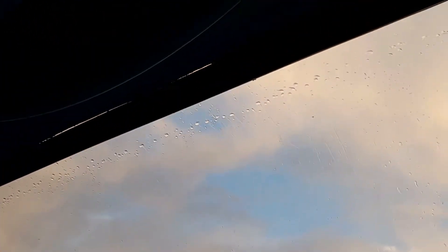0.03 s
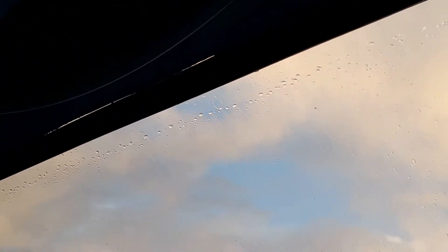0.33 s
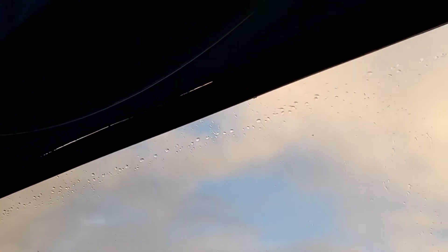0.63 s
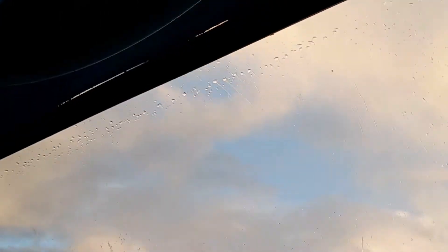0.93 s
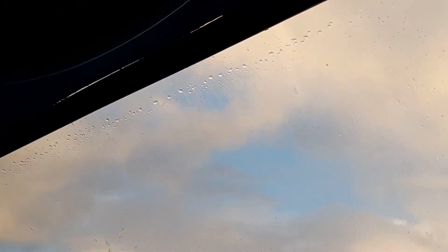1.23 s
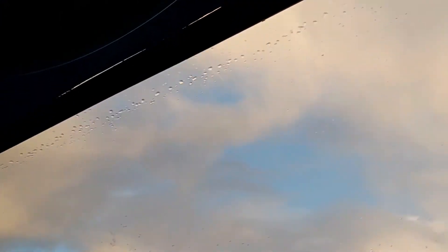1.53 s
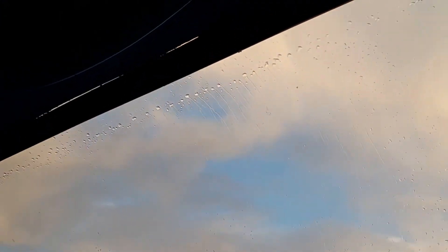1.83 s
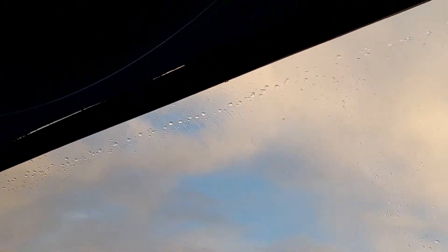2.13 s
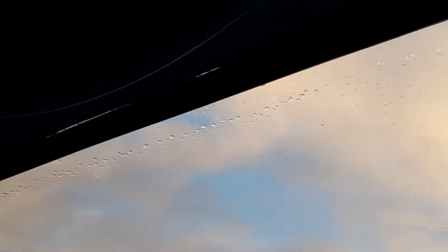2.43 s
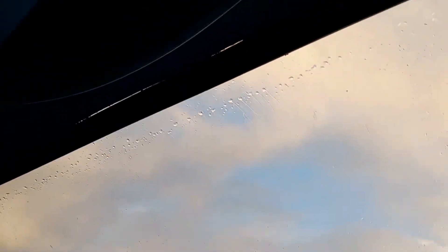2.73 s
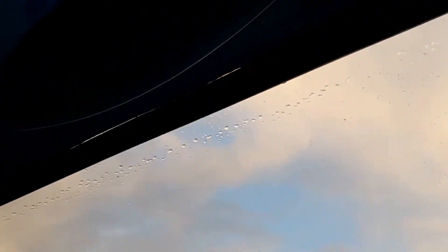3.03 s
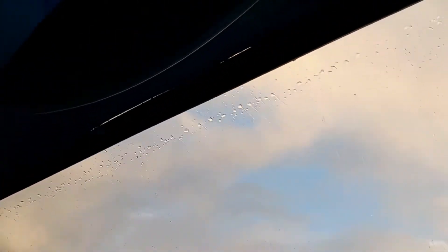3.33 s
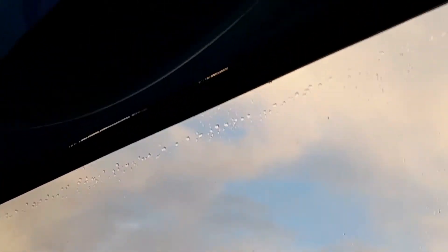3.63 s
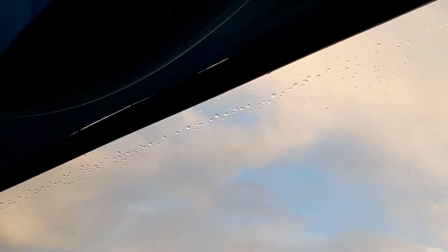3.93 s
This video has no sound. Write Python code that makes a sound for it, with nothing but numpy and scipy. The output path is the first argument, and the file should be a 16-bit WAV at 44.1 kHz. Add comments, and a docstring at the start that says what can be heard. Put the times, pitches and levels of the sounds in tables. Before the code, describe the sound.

A thin, high whistle of air sputters through a window gap, heard close by inside a moving bus. Low engine drone and road rumble continue underneath, while a loose panel knocks unevenly, pauses briefly, then rattles harder.

```python
"""Inside a moving bus, next to a window that does not quite seal.
The drive line booms through the cabin over road rumble; air hisses through the gap and breaks into a thin,
sputtering whistle. A loose panel knocks at uneven moments, now with a dry snap, now with a brighter ring."""
import sys
import numpy as np
from scipy import signal
from scipy.io import wavfile

SR = 44100
rng = np.random.default_rng(int(sys.argv[2]) if len(sys.argv) > 2 else 0)


def unload_audio(sound):
    """Save the sound as a 16-bit wav file, at the path given as the first command line argument."""
    columns = np.transpose(np.atleast_2d(sound))
    # keep every value between -1 and 1, then stretch to whole-number steps
    steps = np.round(np.clip(columns, -1, 1) * 32767)
    wavfile.write(sys.argv[1], SR, steps.astype(np.int16))


N = 176400

# cabin boom: (s, pitch Hz, level dB)
BOOM = [(0, 66.47, -19), (.5, 68.2, -15), (1.0, 68, -16.5), (1.5, 68.8, -14.5), (1.9, 67.73, -16.5), (2.2, 67.85, -21.5), (2.8, 67.4, -20.5), (3.3, 67, -21), (3.7, 67.44, -20.5), (4.0, 66.05, -17)]
BOOM_ORDER = 5  # fixed
# other multiples of the shaft rate: (order, dB in the first seconds, dB in the last)
ORDERS = [(4, -42, -64), (6, -27, -28), (8, -49, -32.5), (10, -30.5, -35.5), (10.92, -44, -30.5), (12, -45, -41.5)]
BOOM_WAVER_DB, ORDER_WAVER_DB, PHASE_WAVER_RAD = 1.5, 2, 0.54
# road rumble and cabin air: (Hz, dB per Hz), (s, level dB)
ROAD = [(20, -11.5), (30, -8), (48, 2), (72, -1.5), (100, 2), (125, -2.5), (160, -9), (200, -9), (260, -17), (330, -13), (420, -22), (560, -21), (720, -22), (1000, -27.5), (1400, -31.5), (2000, -36), (3000, -49)]
ROAD_LEVEL = [(0, -25), (1.4, -26.5), (2.0, -26.5), (2.3, -26), (2.7, -26.5), (3.6, -26), (4.0, -24)]
# panel resonances that the road keeps stirred: (Hz, width Hz, dB)
PANEL_HUM = [(705, 24, -51.5), (861, 20, -55.5), (1270, 46, -62.5)]
# air rushing through the gap: (Hz, dB per Hz), (s, level dB)
HISS = [(1000, 0.5), (2000, 3), (3000, -1.5), (3900, 2.5), (4900, -4.5), (5600, 11), (6400, 0), (7400, -4), (8300, -10.5), (9200, -11.5), (11000, -8.5), (15500, -15)]
HISS_LEVEL = [(0, -40.5), (.65, -42), (1.0, -45.5), (1.8, -43.5), (2.3, -44), (2.7, -47.5), (3.0, -43.5), (3.35, -45), (4.0, -44)]
HISS_FLICKER_DB = 0.7  # fixed
# the whistle: (s, pitch Hz, level dB)
WHISTLE = [(0, 5870, -41), (.17, 5665, -40), (.38, 5650, -40), (.7, 5710, -43), (.85, 5620, -48), (1.0, 5586, -57), (1.27, 5620, -50), (1.36, 5567, -45.5), (1.8, 5670, -44), (2.02, 5562, -46.5), (2.13, 5455, -46.5), (2.26, 5370, -41), (2.37, 5422, -52.5), (2.7, 5230, -52), (2.82, 5170, -70), (2.93, 5400, -48), (3.2, 5442, -55), (3.45, 5430, -57), (3.57, 5436, -41), (3.73, 5320, -57), (4.0, 5375, -54)]
WHISTLE_WIDTH_HZ, WHISTLE_WANDER_HZ, WHISTLE_FLUTTER_DB = 230, 70.4, 1.5
# breathy side tone under the whistle: (s, pitch Hz, level dB)
UNDERTONE = [(0, 5300, -45), (.2, 5300, -42.5), (.65, 5290, -48), (.9, 5000, -48), (1.02, 4940, -56), (1.22, 4850, -49), (1.35, 5035, -49), (1.8, 5080, -49.5), (2.25, 5216, -44.5), (2.7, 4990, -59), (2.95, 5200, -47), (3.3, 5120, -60), (4.0, 5077, -50)]
UNDERTONE_WIDTH_HZ, UNDERTONE_FLUTTER_DB = 540, 1.5
# the jet locks for a moment into a pure chirp: (s, pitch Hz, level dB)
CHIRPS = [(.103, 5900, -46), (.136, 5720, -34.5), (.176, 5727, -33), (0.221, 5600, -43), (.312, 5710, -35), (.336, 5600, -37), (0.382, 5555, -32), (0.52, 5520, -30.5), (.68, 5760, -37), (.927, 5500, -35.5), (1.917, 5870, -43), (2.122, 5320, -47), (2.206, 5370, -41), (2.225, 5250, -34.5), (2.245, 5180, -60), (2.262, 5447, -34), (2.283, 5440, -44), (2.307, 5070, -47), (2.336, 5480, -49), (2.396, 5490, -40), (2.59, 5170, -37.5), (2.636, 5050, -39), (2.916, 5400, -37.5), (3.02, 5450, -37), (3.084, 5433, -44), (3.169, 5420, -38.5), (3.523, 5380, -34.5), (3.602, 5450, -35.5), (3.924, 5470, -41)]
# upper resonance of the gap: (s, pitch Hz, level dB)
OVERTONE = [(0, 7400, -49), (.4, 7120, -53.5), (.68, 7300, -53), (.85, 8000, -55), (1.05, 7700, -54), (1.3, 7980, -56), (1.5, 7360, -55), (1.75, 7160, -50.5), (2.1, 7400, -58.5), (2.45, 7850, -53.5), (2.6, 7486, -52), (2.75, 7310, -55.5), (3.0, 7800, -53), (3.35, 7630, -53), (3.55, 7600, -53.5), (4.0, 7410, -55)]
OVERTONE_WIDTH_HZ, OVERTONE_FLUTTER_DB, OVERTONE_WANDER_HZ = 860, 3, 109.2
WHISTLE_PAN_DB, WHISTLE_LIKENESS, BOOM_PAN_DB, ORDER_PAN_DB = -4.5, -0.43, -4.5, -2.5
# knocks of the loose panel: (s, peak dB, extra ring of its bright rim mode dB, extra snap dB)
KNOCKS = [(0.0872, -27.5, -2, 2), (0.2312, -25.5, 1, 0), (0.3398, -19, -5, 2), (.364, -28, 0, 3), (0.6081, -20, -4.5, -3), (0.98, -23.5, -8, 0), (1.089, -22, -1, -0.5), (1.1626, -27.5, -7, -7), (1.2578, -28.5, -13, -8), (1.333, -25, 7, 1.5), (1.3928, -27, -13, -5), (1.4339, -27.5, -5, -9), (1.4947, -24, 3, -3.5), (1.5927, -19, 5, -4.5), (1.7404, -29, -3, -1), (1.8964, -21.5, 0, -5), (2.0191, -17, 8, 0), (2.0565, -24.5, 7, -3), (2.8024, -21.5, -9, 1), (2.865, -15, 0.5, 1.5), (2.9344, -19, -3, 2.5), (3.054, -14.5, 2, 1), (3.146, -28.5, -2, 1), (3.2603, -19, -8, 1), (3.493, -29, -1, 4.5), (3.5662, -23.5, -2, -6), (3.7276, -13.5, -3.5, -5), (3.8728, -22, 3, 3), (3.927, -19, -14, -25), (3.9818, -18, 5, -2.5)]
# what it rings with: (Hz, dB, t60 s, left-right dB)
PANEL = [(450, -18.5, 0.09, -2), (660, -18, 0.032, -2), (894, -9, 0.018, -3.5), (1080, -7, 0.021, -4), (1300, -7, 0.018, 3.5), (1700, -13.5, 0.013, -4), (2070, -14.5, 0.0077, -12), (2340, -10, 0.0085, -3), (2530, -8.5, 0.0087, -9), (2800, -8, 0.0066, -3), (3253, -10, 0.012, -13), (4060, -16.5, 0.0059, -7), (4200, -23, 0.0053, 1), (5300, -29, 0.0046, 5)]
RIM_MODE_INDEX = 10  # fixed
KNOCK_DB, CONTACT_HZ, CONTACT_OCTAVES_PER_DB = -2, 6500, 0.0052
KNOCK_VARY_DB, KNOCK_DETUNE = 1.2, .012  # fixed
# the gritty snap of the contact: (Hz, dB per Hz)
SNAP = [(380, 8), (600, 5), (850, 8), (1300, 2.5), (1800, 3.5), (2700, 6), (3400, 1.5), (4100, -2.5), (5600, -2.5), (6800, -14.5), (8500, -27)]
GLASS_ECHO_S, GLASS_ECHO_DB = .0024, -4.5
# reflections, from near surfaces and from the whole cabin: (t60 s, energy dB)
REFLECTIONS = [(0.025, -6), (.18, .5)]  # fixed
# the cabin's noise across the ears: (Hz, left-right likeness), (Hz, left-right dB)
LIKENESS = [(60, 0.1), (100, 0.9), (160, 0.8), (270, 0.94), (450, 0.66), (740, 0.52), (1220, -0.03), (5500, 0.06), (15000, 0)]
BALANCE = [(60, -8.5), (100, -1), (160, -2.5), (450, -1), (740, 0.5), (1220, -2), (2500, -4.5), (5000, -2.5), (8000, 0), (15000, -3.5)]
CUTOFF_HZ = 15800  # fixed
SNAP_DB = 4
SNAP_RISE_S, SNAP_DECAY_S = .0008, .0015  # fixed
CHIRP_HALF_S = 0.011
CHIRP_WANDER_HZ = 65  # fixed


def from_db(db):
    """Decibels to gain."""
    return 10 ** (np.asarray(db) / 20)


def rms_one(x):
    """Scale to rms 1."""
    return x / np.sqrt(np.mean(np.abs(x) ** 2) + 1e-20)


def in_time(rows):
    """Join the rows of a curve by straight lines."""
    s, *columns = np.transpose(rows)
    return [np.interp(np.arange(N) / SR, s, c) for c in columns]


def at_hz(points, hz):
    """Read a spectrum on a log-frequency axis."""
    return np.interp(np.log(hz), np.log(np.array(points)[:, 0]), np.array(points)[:, 1])


def pan(db):
    """Left and right gains for a level difference."""
    gains = from_db([[db / 2], [-db / 2]])
    return gains / gains.mean()


def spread(mid, side, alike):
    """Two unrelated signals become a stereo pair of given likeness."""
    alike = np.clip(alike, -.999, .999)  # fixed
    return np.sqrt((1 + alike) / 2) * mid + np.sqrt((1 - alike) / 2) * side * np.array([[1], [-1]])


def drift(rate):
    """Slow chance with spread 1."""
    r = np.exp(-16 * np.pi * rate / SR)  # fixed
    slow = signal.lfilter([1], [1, -2 * r, r * r], rng.standard_normal(N // 8 + 8002))[8000:]  # fixed
    return np.interp(np.arange(N) / 8, np.arange(len(slow)), rms_one(slow))  # fixed


def phase_of(hz):
    """Running phase of a pitch."""
    return 2 * np.pi * np.cumsum(hz * np.ones(N)) / SR


def resonance(hz, width_hz, alike):
    """Stereo noise in one resonance, whose centre may move."""
    phase = phase_of(hz)
    mid, side = [drift(width_hz / 2) * np.cos(phase) + drift(width_hz / 2) * np.sin(phase) for _ in range(2)]
    return spread(mid, side, alike)


def banded_noise(spectrum, patchy_db, flicker_rate):
    """Third-octave bands of stereo noise, each with its own flicker, likeness and balance; rms 1."""
    out, edges = 0, 18 * 2 ** (np.arange(31) / 3)  # fixed
    white = rng.standard_normal((2, 2, N + SR // 2))
    for k, (low, high) in enumerate(zip(edges, edges[1:])):
        hz, flicker = np.sqrt(low * high), drift(flicker_rate)
        if high > spectrum[0][0] and low < spectrum[-1][0]:
            mid, side = signal.sosfilt(signal.butter(3, [low, high], "band", fs=SR, output="sos"), white[k % 2])[:, -N:]  # fixed
            out = out + from_db(at_hz(spectrum, hz) + patchy_db * flicker) * pan(at_hz(BALANCE, hz)) * spread(mid, side, at_hz(LIKENESS, hz))
    return rms_one(out)


def ring(clicks, hz, t60):
    """A unit click sets a mode of height 1 ringing."""
    r, w = from_db(-60 / (t60 * SR)), 2 * np.pi * hz / SR  # fixed
    return signal.lfilter([.5, 0, -.5], [1, -2 * r * np.cos(w), r * r], clicks + 1e-18)


def cabin(x):
    """The direct sound, a hard echo off the glass, then scattered reflections."""
    t = np.arange(SR // 4) / SR  # fixed
    response = np.zeros((2, len(t)))
    response[:, 0] = 1
    response[:, int(GLASS_ECHO_S * SR)] += from_db(GLASS_ECHO_DB)
    for t60, db in REFLECTIONS:
        tail = rng.standard_normal(response.shape) * from_db(-60 * t / t60) * (t > GLASS_ECHO_S)  # fixed
        response += from_db(db) * rms_one(tail) / np.sqrt(len(t))
    return signal.fftconvolve(x, response, axes=1)[:, :N]


def drive_line():
    """One order of the shaft booms in the cabin; weaker ones waver and beat against it."""
    hz, db = in_time(BOOM)
    phase = phase_of(hz)
    out = pan(BOOM_PAN_DB) * from_db(db + BOOM_WAVER_DB * drift(2.24)) * np.sin(phase)
    for order, first_db, last_db in ORDERS:
        gain = from_db(np.linspace(first_db, last_db, N) + ORDER_WAVER_DB * drift(1.9))
        out = out + pan(ORDER_PAN_DB) * gain * np.sin(order / BOOM_ORDER * phase + PHASE_WAVER_RAD * drift(2.2) + rng.uniform(0, 2 * np.pi))
    return np.sqrt(2) * out


def road():
    """Tyre rumble through the body, with a few humming panels."""
    db, = in_time(ROAD_LEVEL)
    hum = sum(from_db(level_db) * resonance(hz, width, at_hz(LIKENESS, hz)) for hz, width, level_db in PANEL_HUM)
    return from_db(db) * banded_noise(ROAD, patchy_db=1.56, flicker_rate=14.6) + hum


def gap_hiss():
    """Smooth rush of air past the seal."""
    db, = in_time(HISS_LEVEL)
    return from_db(db) * banded_noise(HISS, patchy_db=HISS_FLICKER_DB, flicker_rate=22)


def whistle():
    """The turbulent jet stirs three resonances of the gap and sputters into short pure tones."""
    tone = gap_tone(WHISTLE, WHISTLE_WIDTH_HZ, WHISTLE_WANDER_HZ, WHISTLE_FLUTTER_DB, WHISTLE_LIKENESS)
    lower = gap_tone(UNDERTONE, UNDERTONE_WIDTH_HZ, WHISTLE_WANDER_HZ, UNDERTONE_FLUTTER_DB, WHISTLE_LIKENESS)
    upper = gap_tone(OVERTONE, OVERTONE_WIDTH_HZ, OVERTONE_WANDER_HZ, OVERTONE_FLUTTER_DB, 0)
    t, wander, chirps = np.arange(N) / SR, phase_of(CHIRP_WANDER_HZ * drift(91)), np.zeros((2, N))
    for s, hz, db in CHIRPS:
        near = np.abs(t - s) < .05  # fixed
        phase = 2 * np.pi * hz * (t[near] - s) + wander[near]
        chirps[:, near] += from_db(db) * np.exp(-((t[near] - s) / CHIRP_HALF_S) ** 2) * spread(np.cos(phase), np.sin(phase), WHISTLE_LIKENESS)
    return pan(WHISTLE_PAN_DB) * (tone + lower + np.sqrt(2) * chirps) + pan(db=-3.0) * upper


def loose_panel():
    """Each knock strikes the modes a little differently and adds a gritty snap; harder knocks have a shorter, brighter contact."""
    t = np.arange(SR // 16) / SR  # fixed
    clack, burst = np.zeros((2, N + SR)), (1 - np.exp(-t / SNAP_RISE_S)) * np.exp(-t / SNAP_DECAY_S)
    loudest, grit = max(row[1] for row in KNOCKS), banded_noise(SNAP, patchy_db=1, flicker_rate=8.2)
    for (s, db, rim_db, snap_db), chance in zip(KNOCKS, rng.standard_normal((len(KNOCKS), len(PANEL), 2))):
        span = slice(int(s * SR), int(s * SR) + len(t))
        r = np.exp(-2 * np.pi * CONTACT_HZ * 2 ** (CONTACT_OCTAVES_PER_DB * (db - loudest)) / SR)
        force = (1 - r) * r ** np.arange(len(t))
        for k, ((hz, mode_db, t60, side_db), (strength, detune)) in enumerate(zip(PANEL, chance)):
            gain = from_db(db + KNOCK_DB + mode_db + KNOCK_VARY_DB * strength + rim_db * (k == RIM_MODE_INDEX))
            clack[:, span] += (-1) ** k * gain * pan(side_db) * ring(force, hz * (1 + KNOCK_DETUNE * detune), t60)
        snap = burst * grit.take(np.arange(span.start, span.stop), axis=1, mode="wrap")
        clack[:, span] += from_db(db + SNAP_DB + snap_db) * signal.lfilter([1 - r], [1, -r], snap)
    return cabin(clack)


def gap_tone(curve, width_hz, wander_hz, flutter_db, alike):
    """One resonance of the gap, stirred by the jet: its pitch wanders and its level flutters."""
    hz, db = in_time(curve)
    return from_db(db + flutter_db * drift(15)) * resonance(hz + wander_hz * drift(17), width_hz, alike)


def scene():
    """Everything heard from the window seat."""
    return drive_line() + road() + gap_hiss() + whistle() + loose_panel()


def record(dry):
    """The top is cut steeply."""
    return signal.sosfilt(signal.ellip(10, .1, 90, CUTOFF_HZ, fs=SR, output="sos"), dry)  # fixed


dry = scene()
out = record(dry)
unload_audio(out)
```